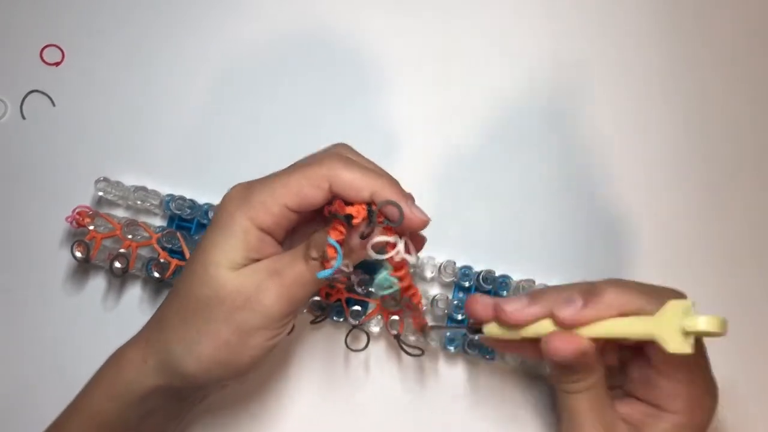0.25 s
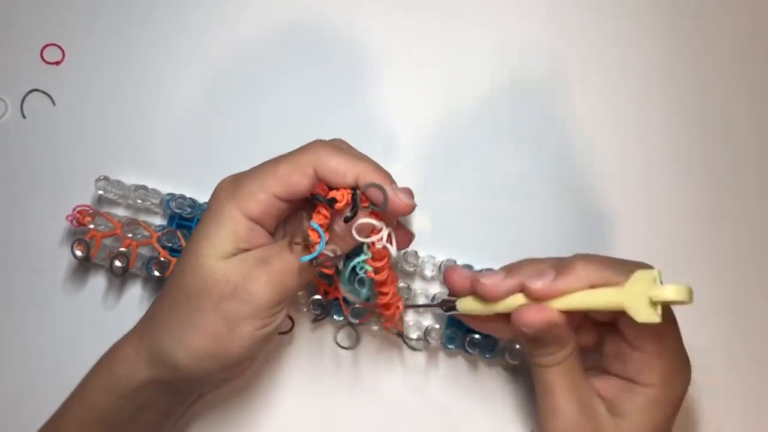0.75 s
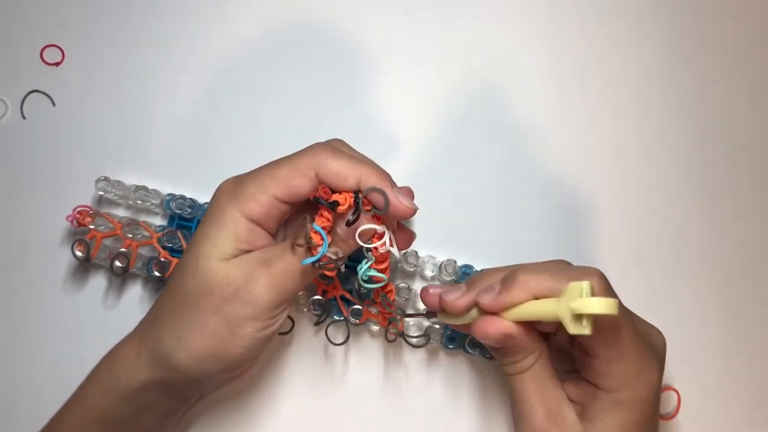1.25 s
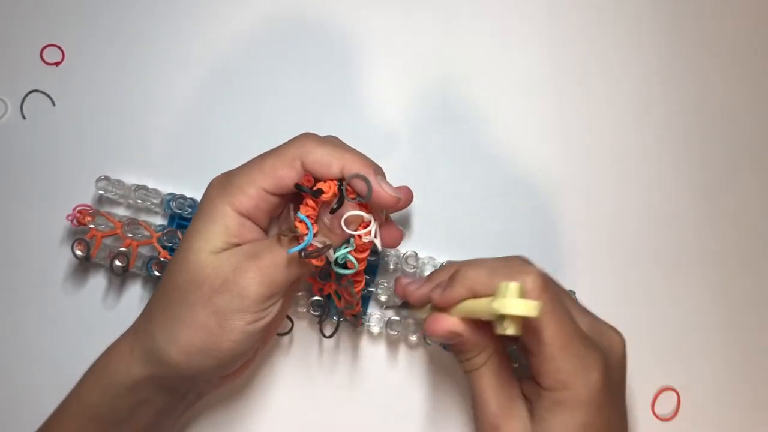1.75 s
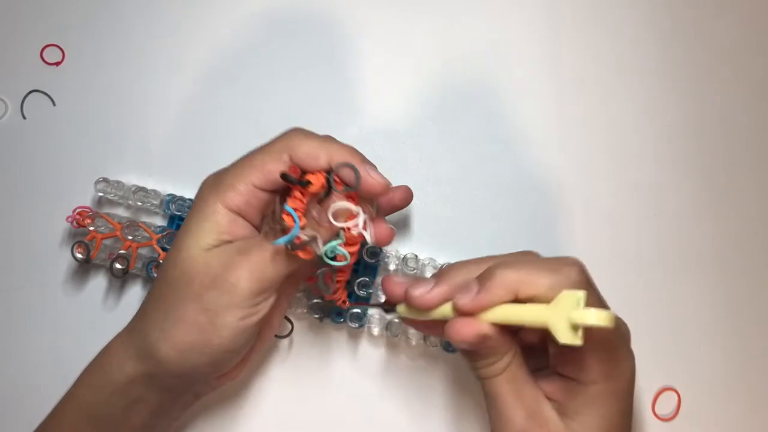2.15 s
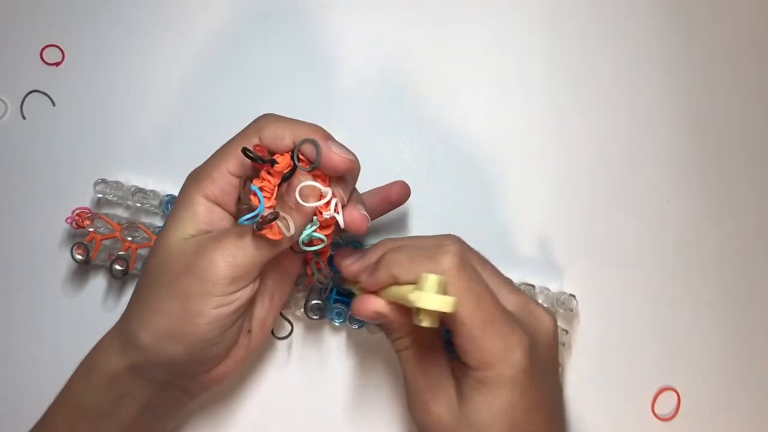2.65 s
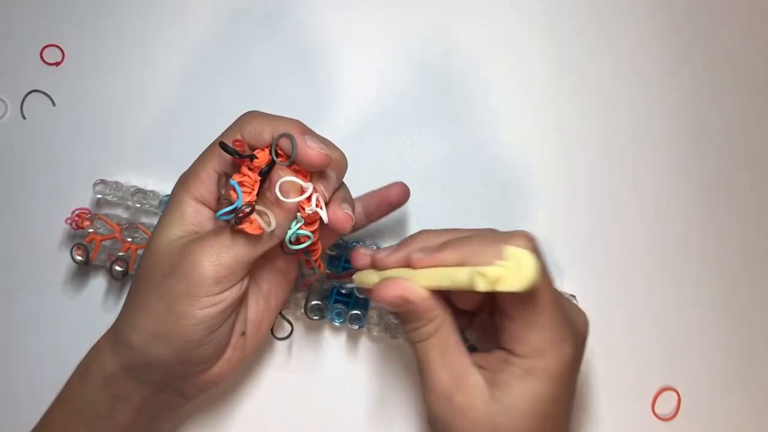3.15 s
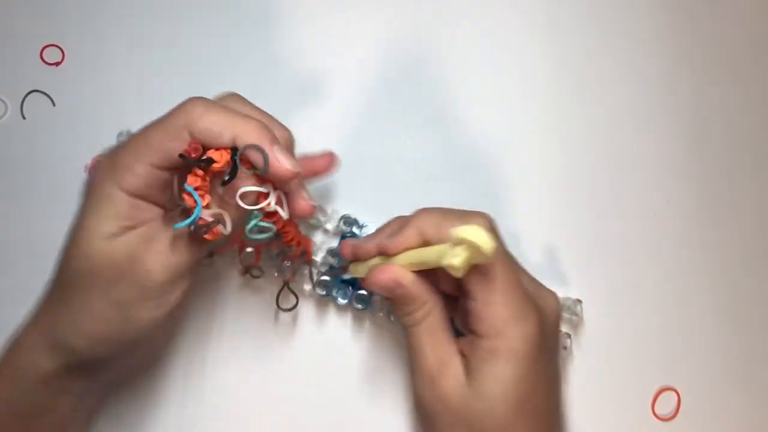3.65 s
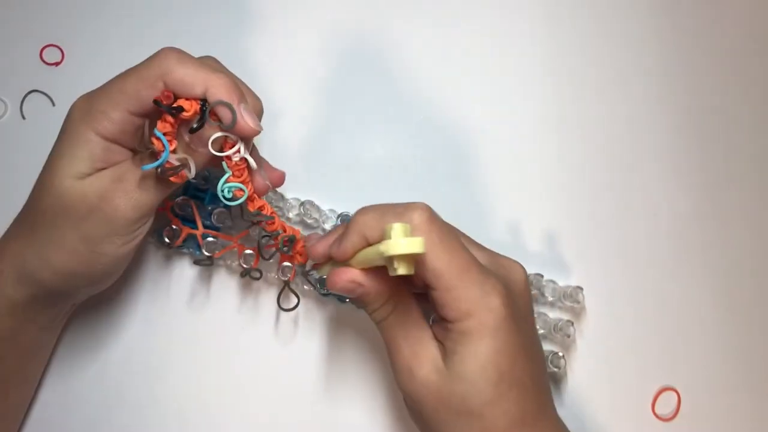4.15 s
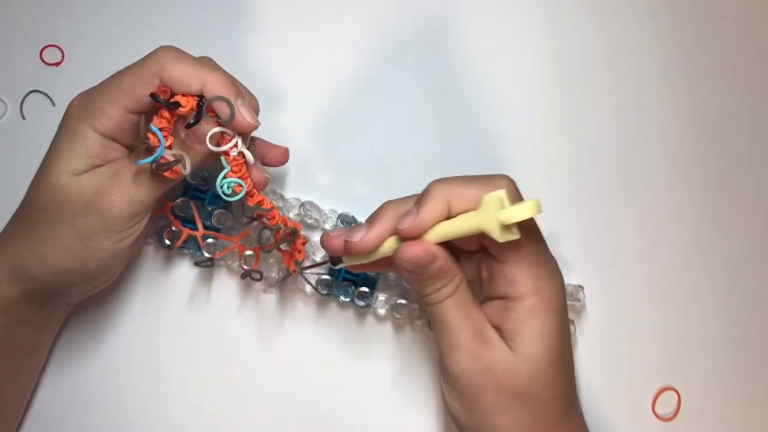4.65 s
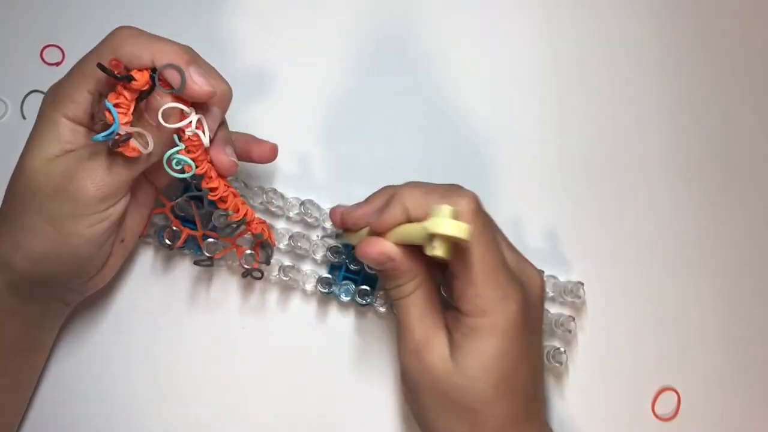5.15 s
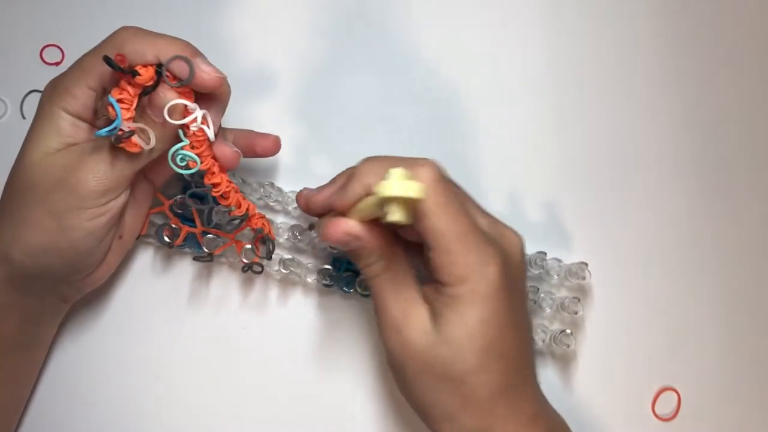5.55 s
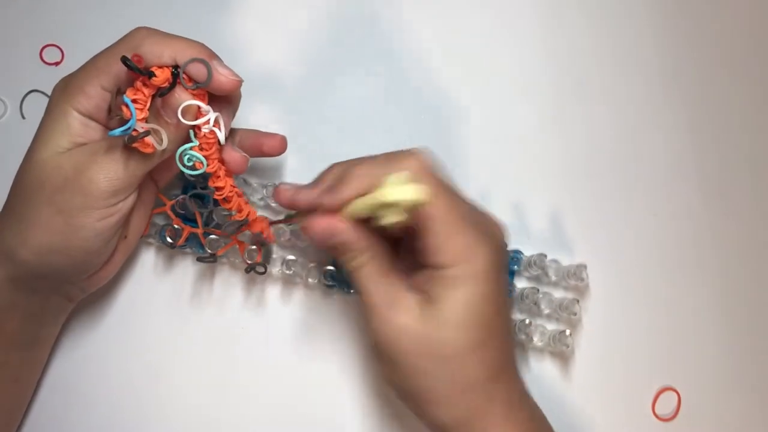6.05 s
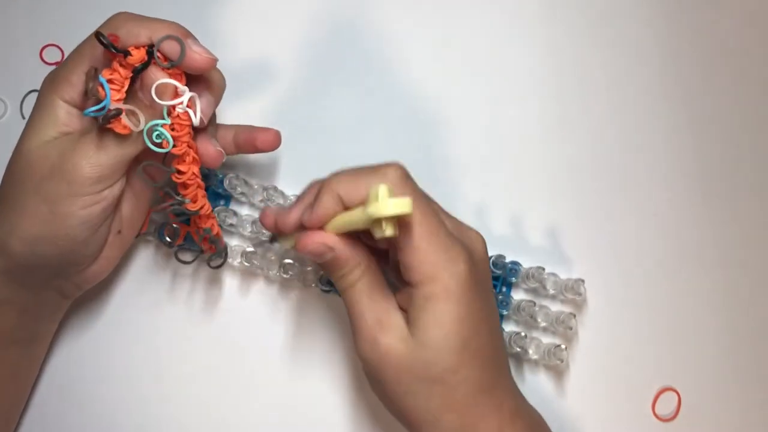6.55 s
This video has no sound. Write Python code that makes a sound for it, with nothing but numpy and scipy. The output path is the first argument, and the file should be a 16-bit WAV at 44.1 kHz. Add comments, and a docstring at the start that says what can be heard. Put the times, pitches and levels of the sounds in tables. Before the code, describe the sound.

Close microphone in a small, quiet indoor room with a short, faint tail. Bright plastic ticks and duller rattling knocks come unevenly, mixed with short hisses of stretched rubber and slight creaks from handling. After about three seconds it grows sparser, with deep muffled bumps on the table; later the clicking thickens into a quick cluster with one sharp click near the end.

```python
"""A hook lifts rubber loops off the pegs of a small plastic loom on a table, close up in a quiet, faintly humming room.
It starts at once with a busy run of pegs ticking and plate and frame knocking, with brief rubber hisses between.
After about three seconds the contacts thin out and soft, deep bumps of the loom on the table stand out.
From about 4.6 s the ticks crowd together again; a dense flurry follows just after 6 s, with a hard click near the end.
Struck modes make the knocks and bumps, tiny random slips make the rubbing, and a short tail of noise is the room."""
import sys
import numpy as np
from scipy import signal
from scipy.fft import rfft, irfft
from scipy.io import wavfile

SR = 44100
rng = np.random.default_rng(int(sys.argv[2]) if len(sys.argv) > 2 else 0)


def int16_out(signal):
    """Quantize to a 16-bit WAV file."""
    q = np.round(np.clip(np.atleast_2d(signal).T, -1, 1) * 32767)
    wavfile.write(sys.argv[1], SR, q.astype(np.int16))


N = 299880  # length in samples


def undb(db):
    """Decibels to gain."""
    return 10 ** (np.asarray(db) / 20)


def unit(x):
    """Scale to an energy of one."""
    return x / np.sqrt(np.sum(x ** 2) + 1e-18)


def decay(t, t60):
    """Exponential decay that has lost 60 dB after t60 seconds."""
    return np.exp(-np.log(1000) * t / t60)


def ring(t, hz, t60):
    """A struck mode: a sine that dies away."""
    return np.sin(2 * np.pi * hz * t) * decay(t, t60)


def band(x, lo_hz, hi_hz, order=3):
    """Causal band-pass."""
    edges = [lo_hz, min(hi_hz, SR / 2 - 1)]
    return signal.sosfilt(signal.butter(order, edges, "band", fs=SR, output="sos"), x)


def colour(x, points):
    """Filter a sound with a curve of (Hz, dB) points and bring it to an rms of one."""
    hz, db = np.transpose(points)
    f = np.maximum(np.fft.rfftfreq(len(x), 1 / SR), 1)
    gain = undb(np.interp(np.log(f), np.log(hz), db))
    return unit(irfft(rfft(x) * gain, len(x))) * np.sqrt(len(x))


def resonance(hz, centre_hz, q):
    """Level in dB of one resonance, 0 at its centre."""
    return -10 * np.log10(1 + (q * (hz / centre_hz - centre_hz / hz)) ** 2)


def walk(rate):
    """Smooth random wander with a spread near one, heading for a new value `rate` times a second."""
    knots = rng.standard_normal(1024)
    return np.interp(np.arange(N) / SR * rate, np.arange(len(knots)), knots)


def add(track, start_s, sound):
    """Mix a sound into a track."""
    i = int(np.clip(start_s * SR, 0, N - 1))
    track[i:i + len(sound)] += sound[:N - i]


def friction(slips_per_s, spread_db, smooth_db, slip_s=0.0019):
    """Tiny slips of unequal size, each a scratch that dies away, over a smooth slide."""
    slip_happens = rng.random(N) < slips_per_s / SR
    slip_size = undb(spread_db * np.minimum(rng.exponential(size=N), 3))
    grip = signal.lfilter([1], [1, -np.exp(-1 / (slip_s * SR))], slip_happens * slip_size)
    scratches = unit(grip * rng.standard_normal(N))
    slide = unit(rng.standard_normal(N))
    return scratches + undb(smooth_db) * slide


# Spectrum of the quiet room. Each row: frequency in Hz, relative level per Hz in dB.
ROOM_TONE_COLOUR = [(25, -10.5), (55, 13.5), (80, 0.5), (115, 1.5), (300, -12), (750, -14.5), (1050, -13.5),
                    (2000, -22.5), (3300, -20.5), (6300, -23.5), (10000, -28), (16000, -25)]


def room_tone(level_db=-67.5, wander_db=0.24):
    """Faint, nearly steady rumble and hiss: coloured noise whose level wanders a little."""
    return colour(rng.standard_normal(N), ROOM_TONE_COLOUR) * undb(level_db + wander_db * walk(1))


# The room's answer, band by band. Each row: lowest in Hz, highest in Hz, t60 in seconds, level in dB.
ROOM_BANDS = [(102.8, 458, 0.22, -7), (486, 1680, 0.28, -13), (1580, 5450, 0.27, -14),
              (4880, 9400, 0.19, -16), (9000, 17000, 0.1, -17.5)]


def room(x, gap_s=0.0011, build_s=0.0045):
    """Reflections from the table and near walls merge into a short tail that loses its top first."""
    t = np.arange(SR // 2) / SR
    onset = 1 - np.exp(-np.maximum(t - gap_s, 0) / build_s)
    response = 0
    for lo_hz, hi_hz, t60, db in ROOM_BANDS:
        tail = band(rng.standard_normal(len(t)), lo_hz, hi_hz) * onset * decay(t, t60)
        width_gain = np.sqrt(2 * (hi_hz - lo_hz) / SR)  # wider bands carry more energy
        response = response + unit(tail) * undb(db) * width_gain
    return signal.fftconvolve(x, response)[:N]


# What friction brings out of the frame, here and in the rubs. Each row: frequency in Hz, relative level per Hz in dB.
FRAME_SPECTRUM = [(50, 7), (120, 6.5), (190, 4), (380, 3), (560, -10), (760, -10.5), (1050, -9),
                  (1600, -18), (3000, -18), (8000, -36)]


def fidget(creak_db=-72, tick_db=-86):
    """Fingers never hold the loom quite still: sparse slips make faint creaks in the frame and stray ticks."""
    creaks = colour(friction(slips_per_s=80, spread_db=4.5, smooth_db=-5), FRAME_SPECTRUM)
    sparse_slips = friction(slips_per_s=20, spread_db=2, smooth_db=-20)
    ticks = unit(band(sparse_slips, 1500, 13000, order=1)) * np.sqrt(N)  # rms of one
    return undb(creak_db) * creaks + undb(tick_db) * ticks


BUMP_HZ, BUMP_T60_S, BUMP_DAMPING = 110, 0.15, 0.92  # ring time at this pitch; it shortens as pitch to this power
SWAY_HZ, SWAY_T60_S, SWAY_DB = 49.3, 0.11, -8  # the whole table sways under every bump
# Soft bumps of the loom and hands on the table.
# Each row: start in seconds, level in dB of the rocking before its soft onset, pitch in Hz.
TABLE_BUMPS = [ (0.191, -40.5, 113), (.207, -36, 58.4), (0.68, -47.5, 58), (.855, -46, 114),
               (2.071, -54, 112), (3.582, -43, 168), (3.633, -34.5, 249), (3.643, -47, 50.5),
               (3.847, -33.5, 181.7), (3.849, -43.5, 103.5), (4.617, -47, 123), (4.669, -43, 105),
               (4.994, -47, 162), (5.275, -51, 128), (5.683, -35.5, 212), (6.068, -32.5, 121),
               (6.077, -43, 113), (6.355, -56, 227), ]


def bumps(rise_s=0.0047, spread=1.66, dull_db=-6):
    """A soft landing rocks the table top, with a dull cluster of modes around that pitch and a deep sway."""
    out = np.zeros(N)
    t = np.arange(SR // 3) / SR
    soft_onset = 1 - np.exp(-t / rise_s)
    sway = undb(SWAY_DB) * ring(t, SWAY_HZ, SWAY_T60_S)
    for start_s, db, hz in TABLE_BUMPS:
        t60 = BUMP_T60_S * (BUMP_HZ / hz) ** BUMP_DAMPING
        rock = ring(t, hz, t60)
        fading_noise = rng.standard_normal(len(t)) * decay(t, t60)
        cluster = band(fading_noise, hz / spread, hz * spread, order=2)
        cluster = unit(cluster) * np.linalg.norm(rock)  # as much energy as the rocking
        thud = rock + undb(dull_db) * cluster + sway
        add(out, start_s, undb(db) * thud * soft_onset)
    return out


# Narrow resonances of the pegs under a dragged loop. Each row: centre in Hz, width in Hz, boost in dB.
PEG_RUB_RINGS = [(3860, 150, 6), (5400, 200, 11.5), (5400, 170, -2.5), (6550, 370, 4), (7440, 200, -14),
                 (8580, 200, 3)]
# Rubber loops dragged along the pegs. Each row: start in seconds, end in seconds, hiss level in dB,
# centre of the hiss in Hz, frame level in dB; both levels before the trims hiss_db and frame_db.
LOOP_RUBS = [ (0, 0.048, -77, 3000, -55.5), (0.093, 0.171, -62.5, 8400, -50.5),
             (0.562, 0.663, -61.5, 8000, -64.5), (0.661, 0.707, -52, 2960, -46.5),
             (1.217, 1.269, -68.5, 11000, -61.5), (1.293, 1.486, -66, 7660, -66),
             (1.466, 1.497, -47, 3080, -47), (1.632, 1.65, -63, 4500, -57), (1.917, 1.932, -62, 8000, -50),
             (1.972, 2.073, -63.5, 9000, -57.5), (2.541, 2.62, -64.5, 7000, -56),
             (2.722, 2.922, -75, 8700, -67), (2.907, 2.936, -54.5, 7440, -49.5),
             (3.072, 3.094, -60, 5200, -57), (3.264, 3.342, -72, 5000, -61.5),
             (3.518, 3.654, -66, 4660, -55.5), (3.8, 4.283, -71, 5400, -81), (4.967, 5.015, -58, 5500, -51),
             (5.29, 5.366, -65.5, 9900, -78), (5.448, 5.558, -68.5, 7640, -63),
             (5.687, 5.87, -74, 6900, -56), (5.942, 6.035, -66, 4300, -54.5),
             (6.027, 6.087, -72, 4500, -44), (6.458, 6.496, -67, 6000, -51), ]


def rubs(hiss_q=0.95, frame_db=-1, hiss_db=-2, peg_hz=5400, peg_q=4, peg_db=3):
    """A loop hisses louder as it stretches along a peg, then lets go; the peg colours it and the frame rumbles."""
    out = np.zeros(N)
    scratch = friction(slips_per_s=380, spread_db=4.5, smooth_db=0) * undb(2 * walk(70))
    hz = np.geomspace(100, 20000, num=600)
    peg_ring_db = peg_db * undb(resonance(hz, peg_hz, peg_q))
    for ring_hz, width_hz, boost_db in PEG_RUB_RINGS:
        peg_ring_db = peg_ring_db + boost_db * undb(resonance(hz, ring_hz, ring_hz / width_hz)) ** 2
    for start_s, end_s, treble_db, centre_hz, body_db in LOOP_RUBS:
        drag = scratch[int(start_s * SR):int(end_s * SR)]
        hiss_curve_db = resonance(hz, centre_hz, hiss_q) + peg_ring_db
        hiss = colour(drag, np.transpose([hz, hiss_curve_db]))
        body = colour(drag, FRAME_SPECTRUM)
        progress = np.linspace(0, 1, len(drag), endpoint=False)
        tension = np.sin(np.pi * progress ** 2) ** .5  # fullest past the middle
        rub = undb(treble_db + hiss_db) * hiss + undb(body_db + frame_db) * body
        add(out, start_s, tension * rub)
    return out


GRAZE_S, GRAZE_DB = 0.0038, -19  # length in seconds, level in dB relative to the contact's strength
# Contacts of hook and loops with the loom, for the grazes and the strikes.
# Each row: start in seconds, strength in dB (each part then adds its own levels), hardness in dB per octave
# above the plate, weight on the frame in dB relative to the strength, favoured frame mode in Hz,
# favoured plate mode in Hz.
HOOK_CONTACTS = [(0.002, -56, -4.5, 6.5, 392, 623), (0.124, -57.5, 1.3, 9, 307, 905),
                 (0.1765, -44.5, 0.7, -1, 186, 907), (0.187, -42, 1.65, 2.5, 181, 890),
                 (0.3345, -36, 0.35, -3, 392, 1112), (0.393, -48, -2.5, -8, 420, 1180),
                 (0.4034, -47, -3, 7, 410, 1140), (0.4285, -58, 2.1, 3, 385, 596),
                 (0.5114, -53.5, 4.5, -0.5, 354, 1050), (0.6747, -46.5, 2.0, 10.5, 396, 924),
                 (0.6875, -44.5, -0.5, 4.5, 404, 920), (0.6979, -47.5, 0.5, -4, 384, 1163),
                 (0.822, -66.5, 0.4, 14, 201, 666), (0.84, -49.8, 4.0, 9.5, 347, 1024),
                 (0.8549, -39.5, -0.5, 5.5, 330, 1150), (0.9408, -59.5, -1, 1, 275, 1100),
                 (0.9568, -55.5, 3, 0.5, 393, 1160), (1.0323, -49.5, 2.0, 3.5, 259, 1300),
                 (1.2937, -47.5, 0.65, 6, 370, 1380), (1.4737, -50, -0.3, 4, 185, 910),
                 (1.4853, -47, 0.2, 4, 185, 1300), (1.5054, -47.5, -1, 3, 393, 826),
                 (1.651, -47.5, 4, 6, 320, 1147), (1.741, -56.5, 3, 1, 352, 1000),
                 (1.814, -51, 2, 5, 347, 667), (1.8915, -45, -7.0, -1.5, 184, 990),
                 (1.8999, -43.5, -3, -2, 343, 1004), (1.9515, -47.5, 1.5, -2, 350, 980),
                 (2.07, -41.5, 0, 4, 177, 866), (2.134, -56, -1.5, 2, 490, 835),
                 (2.1436, -57, 0.1, 6.5, 181, 840), (2.279, -51.5, -1.4, 0, 192, 865),
                 (2.4253, -51, 1.2, -1, 427, 1290), (2.487, -45, -7, 2, 262, 1120),
                 (2.5056, -59, 2.5, 11, 405, 840), (2.5984, -50, 1, 4.5, 263, 1062),
                 (2.7279, -50, 0.3, 0.5, 397, 825), (2.841, -75, 1, -7, 270, 1150),
                 (2.881, -58.5, -1.5, 2, 280, 1295), (3.131, -54.5, 4.5, 3, 254, 1176),
                 (3.356, -49.0, -0.5, -2, 407, 1124), (3.4408, -61.5, -3.5, 3, 178, 1380),
                 (3.5729, -52, 4.1, -2, 182, 1350), (3.5772, -51, 7, 7.5, 178, 1220),
                 (4.0429, -50.5, -5.5, 2, 193, 642), (4.096, -61, -4, 0, 313, 990),
                 (4.1576, -55, 0.0, -8, 273, 1035), (4.248, -61, -1.0, 4.5, 262, 940),
                 (4.445, -70, -1.5, 0, 190, 1080), (4.559, -45, -0.5, 7.5, 462, 1120),
                 (4.6146, -46, -0.6, 7, 416, 900), (4.6663, -43, 2, -12, 177, 1160),
                 (4.7134, -45, -2.2, -22, 296, 917), (4.76, -41, -1.4, -0.5, 263, 814),
                 (4.8265, -50.5, 3.0, -18, 272, 964), (4.9186, -45, 4, 3, 200, 920),
                 (4.9698, -56.5, -1, -5, 194, 890), (4.994, -38, 2.46, 3.5, 199, 1156),
                 (5.0351, -43, 0.0, -4.5, 274, 903), (5.168, -68, -0.5, 0, 310, 1116),
                 (5.2733, -50.5, 0, 3.5, 188, 1077), (5.3047, -52.8, 2.1, 7, 320, 935),
                 (5.5513, -59, 0.5, 5, 338, 886), (5.636, -56.5, 5.5, 1, 306, 930),
                 (5.6463, -52.5, 0.5, -5, 320, 945), (5.7228, -59, -0.5, 9.5, 180, 676),
                 (5.7467, -44.2, -3, -0.5, 331, 885), (5.8209, -58.0, -1.5, -10, 332, 950),
                 (6.0683, -38, -1.06, 5, 423, 646), (6.0761, -46.5, -3.2, -2, 360, 674),
                 (6.1069, -45.5, -8, -5, 430, 930), (6.1175, -41, -3.5, 2, 180, 937),
                 (6.1276, -58, 0, 10, 310, 660), (6.1457, -43, -4, -3, 188, 655),
                 (6.215, -48.5, 0.4, 9, 276, 960), (6.2859, -51, 0.7, 2, 322, 985),
                 (6.295, -44.2, 3, 6, 333, 1070), (6.3152, -43.5, 1.4, 1, 304, 1043),
                 (6.3831, -56.5, -3, -5, 199, 974), (6.4816, -46.0, 1.5, -4, 334, 960),
                 (6.5055, -48.5, 1.6, -1.5, 194, 950), (6.6601, -35.4, -0.65, 0, 322, 970),
                 (6.689, -59, 2, 4, 362, 950), (6.77, -46.5, 4, -3, 285, 1082),
                 (6.778, -52, 6, 4.5, 297, 1086)]


def grazes():
    """The hook scrapes along the peg just before it catches: a brief rising run of slips."""
    out = np.zeros(N)
    scrape = friction(slips_per_s=900, spread_db=4.5, smooth_db=-6)
    bright = colour(scrape, [(200, -30), (1000, 11), (2000, -1), (6000, 1), (9000, -10), (16000, -3)])
    size = int(GRAZE_S * SR)
    swell = np.linspace(0, 1, size) ** .5
    for start_s, strength_db, *_ in HOOK_CONTACTS:
        i = int(start_s * SR)
        if i >= size:  # a contact right at the start has no room for one
            add(out, start_s - GRAZE_S, undb(strength_db + GRAZE_DB) * bright[i - size:i] * swell)
    return out


# Modes of the loom before detuning. Each row: frequency in Hz, relative level in dB, t60 in seconds.
LOOM_MODES = [ (115.96, -9, 0.12), (186.7, -3, 0.1), (263.5, -0.5, 0.092), (326.2, -2.5, 0.095),
              (401.2, -1.5, 0.079), (499, -2.5, 0.048), (592, -11.5, 0.041), (654, 1.5, 0.047),
              (853, -14, 0.18), (936.4, 3.5, 0.067), (1044, 3, 0.019), (1122.4, 5, 0.067),
              (1237, -8.5, 0.016), (1400, 11.5, 0.018), (2387, 2, 0.026), (2573, 11, 0.017),
              (2880, -35, 0.027), (3720, 11, 0.013), (4020, 11, 0.021), (5400, 3.5, 0.012),
              (5900, -33, 0.0066), (6610, 6.5, 0.0089), (6810, 2, 0.036), (7840, -6, 0.033),
              (8713, -12, 0.016), (9630, 1.5, .008), (10400, -25.5, 0.0063), (11500, -18.5, 0.0091), ]


def strike_part(part, favoured_hz=None, favoured_t60=.05, favoured_db=0, focus_db=0, detune=0.016):
    """One part of the loom under all contacts: every touch point weights its modes differently."""
    lo_hz, hi_hz, lag_s, rise_s, crowd_t60, crowd_db, trim_db = part
    hz, db, t60 = np.transpose([m for m in LOOM_MODES if lo_hz <= m[0] < hi_hz])
    t = np.arange(SR // 8) / SR
    modes = undb(db)[:, None] * ring(t, hz[:, None], t60[:, None])
    weights = rng.standard_normal((len(HOOK_CONTACTS), len(hz)))
    if favoured_hz is not None:  # modes lose focus_db for each octave away from the favoured one
        octaves_away = np.abs(np.log2(hz / favoured_hz[:, None]))
        weights = weights * undb(-focus_db * octaves_away)
    strong = weights @ modes
    crowd = band(rng.standard_normal(strong.shape) * decay(t, crowd_t60), lo_hz, hi_hz)
    push = 1 - np.exp(-t / rise_s)  # heavy parts take longer to get moving
    level = undb(trim_db) * np.sqrt(SR * .01)  # energy is spread over 10 ms
    # grip and loop tension shift the modes a little
    stretch = np.exp(detune * rng.standard_normal(len(HOOK_CONTACTS)))
    blows = []
    for k in range(len(HOOK_CONTACTS)):
        detuned = np.interp(t * stretch[k], t, strong[k])
        blow = unit(detuned) + undb(crowd_db) * unit(crowd[k])
        if favoured_hz is not None:  # the mode with a belly at the touch point stands out
            blow = blow + undb(favoured_db) * unit(ring(t, favoured_hz[k], favoured_t60))
        blows.append(unit(blow * push) * level)
    return lag_s, blows


def snap_tip(tip, tip_hz, broad_db=-4):
    """The tip snaps over the whole top, strongest in a band around its pitch."""
    lag_s, broad_snaps = strike_part(tip)
    snaps = []
    for broad, hz in zip(broad_snaps, tip_hz):
        focused = unit(band(broad, 0.75 * hz, 1.25 * hz, order=1))
        mixed = focused + undb(broad_db) * unit(broad)
        snaps.append(unit(mixed) * np.linalg.norm(broad))
    return lag_s, snaps


TIP_HZ, TIP_SCATTER_OCT = 11400, 0.17  # middle pitch of the tip's snap, its scatter in octaves
HOOK_OCT, PEG_OCT, TIP_OCT = 1.08, 2.57, 3.55  # octaves over which hardness acts on each part
PEG_OCT_PER_HARDNESS, PEG_SCATTER_OCT = 0.034, 0.13  # a harder contact rings the peg higher; no two pegs are alike
# the hook chatters after it lands: mean gap between rebounds, level of the first, loss with each further one
REBOUND_GAP_S, REBOUND_DB, REBOUND_LOSS_DB = 0.013, -17, 3.5
# Parts of the loom: frame, plate, hook, peg, tip. Each row: lowest in Hz, highest in Hz, lag in seconds,
# rise time in seconds, t60 in seconds of the crowd of weak modes, its level in dB relative to the strong modes, trim in dB.
LOOM_PARTS = [ (114.87, 600, 0.0012, 0.0027, 0.1, -4, 1), (552, 1650, 0.00052, 0.0009, 0.063, -2, -0.5),
              (1600, 4780, 0.000078, 0.00012, 0.027, 0.5, 0), (4780, 8740, 0.000074, 0.0001, 0.017, 1, -2),
              (8200, 15000, .0001, 0.00006, 0.009, 6, -2), ]
# The click changes as the hook moves along the loom. Each row: time in seconds, ring of the peg in Hz at
# hardness zero before scatter, level of the hook's ring in dB, level of the topmost snap in dB;
# both levels relative to the strength, before hardness acts.
CLICK_PATH = [(0.0, 6200, -4.5, -7), (0.7, 5810, -2.5, -7.5), (1.5, 6480, -0.3, -3.5), (1.95, 5930, -6, -7),
              (2.7, 5850, -4, -10), (3.498, 7030, -1, -4.5), (4.65, 5200, -6, -4.5),
              (5.0, 6950, -7.5, -13.5), (5.7, 6580, -0.7, -6.5), (6.14, 6530, -7, -2),
              (6.3, 6760, -10, -13), (6.8, 6070, -7.5, -21.5)]


def loom(peg_db=-1, hardest=5.2, dull_db=2, count=3):
    """Peg, hook and tip tick almost together, then plate and frame knock a moment later; faint rebounds follow."""
    times, strength, hardness, weight, frame_hz, plate_hz = np.transpose(HOOK_CONTACTS)
    frame, plate, hook, peg, tip = LOOM_PARTS
    place_s, *place = np.transpose(CLICK_PATH)
    ring_hz, hook_db, snap_db = (np.interp(times, place_s, column) for column in place)
    # hard contacts reach the small, high parts, until the tip gives way; soft ones mostly stir plate and frame
    levels = [
        strength + weight,
        strength,
        strength + hardness * HOOK_OCT + hook_db,
        strength + hardness * PEG_OCT + peg_db,
        strength + np.minimum(hardness, hardest) * TIP_OCT + snap_db,
    ]
    peg_luck, tip_luck = rng.standard_normal((len(times), 2)).T
    peg_hz = ring_hz * 2 ** (PEG_OCT_PER_HARDNESS * hardness + PEG_SCATTER_OCT * peg_luck)
    tip_hz = TIP_HZ * 2 ** (TIP_SCATTER_OCT * np.clip(tip_luck, -1, 1))
    rebounds_s = np.cumsum(REBOUND_GAP_S * rng.exponential(size=(len(times), count)), axis=1)
    struck = [
        strike_part(frame, frame_hz, favoured_t60=0.052, favoured_db=2, focus_db=4),
        strike_part(plate, plate_hz, favoured_t60=0.043, favoured_db=3, focus_db=9.5),
        strike_part(hook, detune=.07),
        strike_part(peg, peg_hz, favoured_t60=.004, detune=.03),
        snap_tip(tip, tip_hz),
    ]
    out = np.zeros(N)
    for (lag_s, blows), part_db in zip(struck, levels):
        for start_s, db, blow in zip(times, part_db, blows):
            add(out, start_s + lag_s, undb(db) * blow)
    # rebounds are soft: each higher part gets dull_db less than the one below, and the tip does not snap
    for rank, ((lag_s, blows), part_db) in enumerate(zip(struck[:4], levels)):
        soft_db = part_db - rank * dull_db + REBOUND_DB
        for start_s, db, blow, delays in zip(times, soft_db, blows, rebounds_s):
            for k, delay in enumerate(delays):
                add(out, start_s + lag_s + delay, undb(db - k * REBOUND_LOSS_DB) * blow)
    return out


def scene():
    """Loom, hands and room at one microphone."""
    near = loom() + grazes() + bumps() + rubs() + fidget()
    return (near + room(near) + room_tone())[None]


def record(dry, bottom_hz=34, top_hz=16000):
    """The recorder drops the deepest rumble with a gentle high-pass and cuts the top with a steep low-pass."""
    without_rumble = signal.sosfilt(signal.butter(3, bottom_hz, "high", fs=SR, output="sos"), dry)
    return signal.sosfilt(signal.ellip(8, .2, 70, top_hz, fs=SR, output="sos"), without_rumble)


dry = scene()
out = record(dry)
int16_out(out)
```